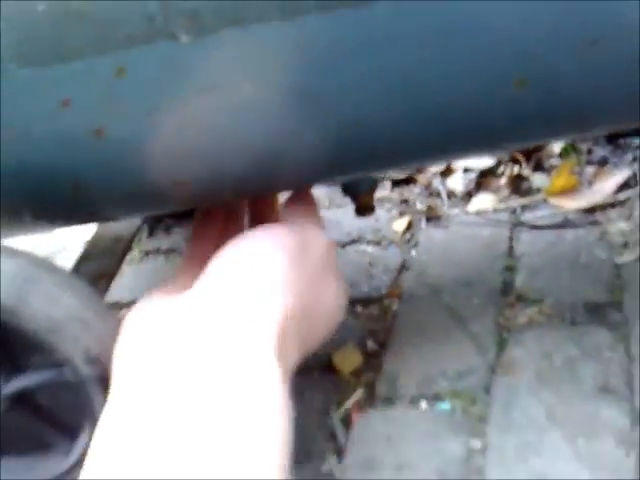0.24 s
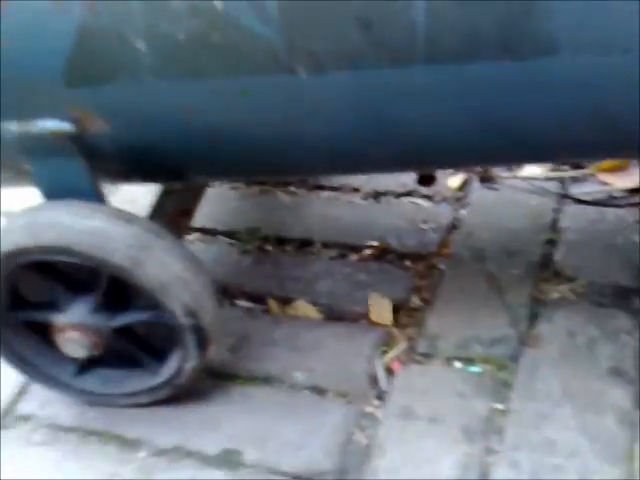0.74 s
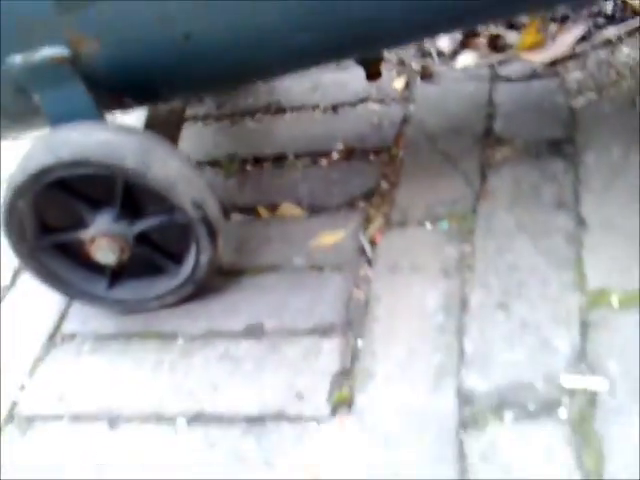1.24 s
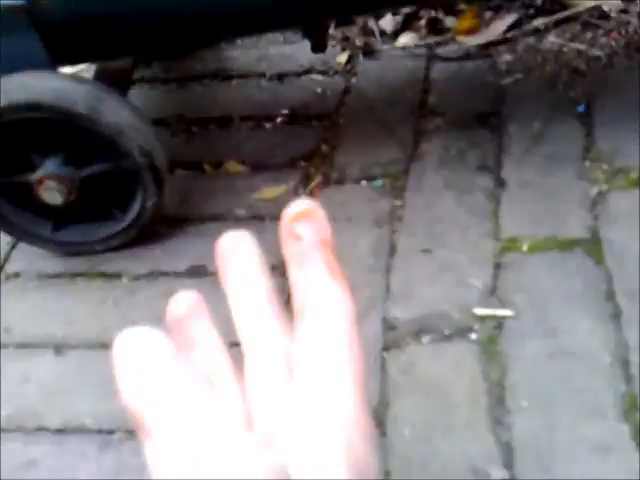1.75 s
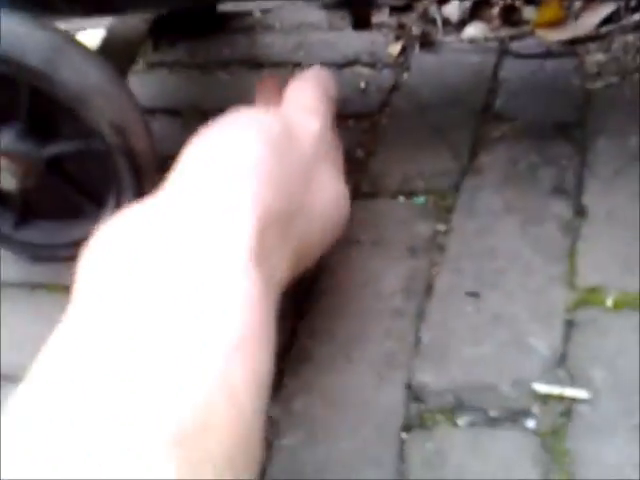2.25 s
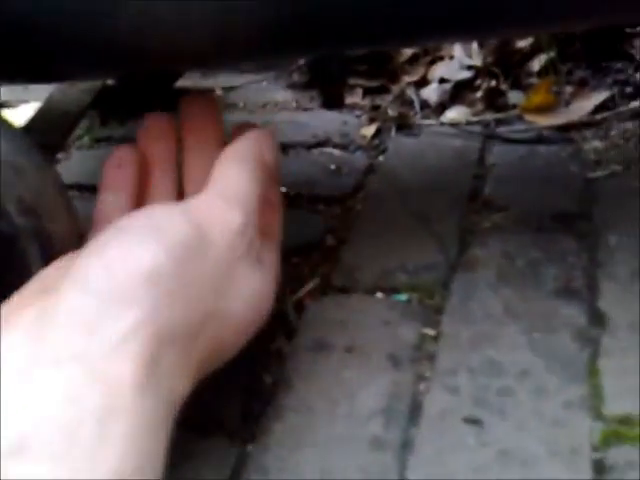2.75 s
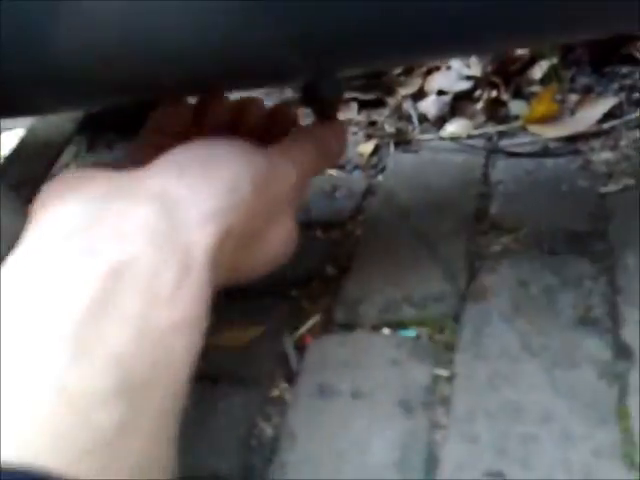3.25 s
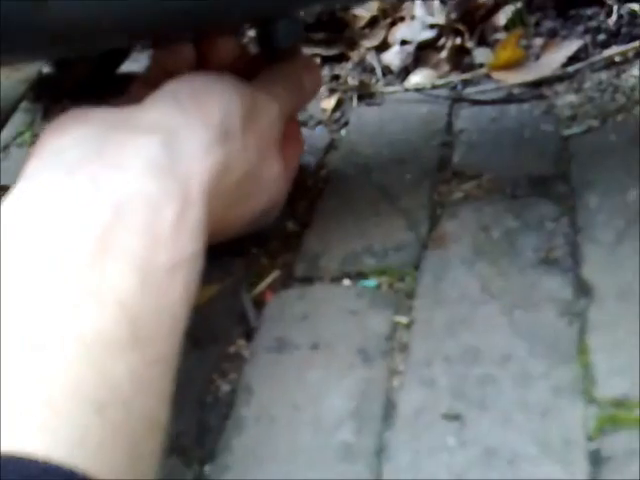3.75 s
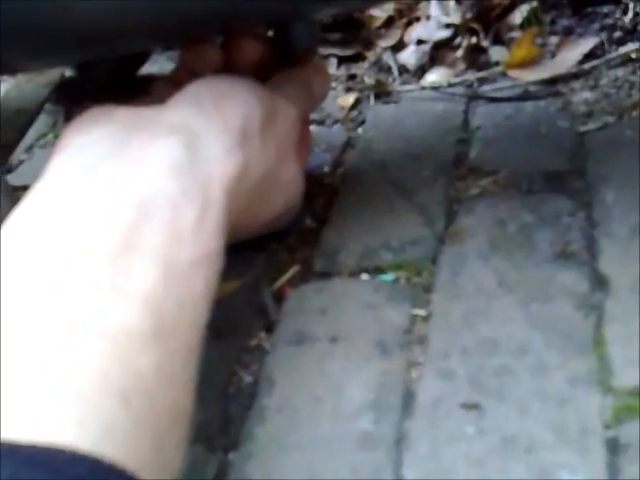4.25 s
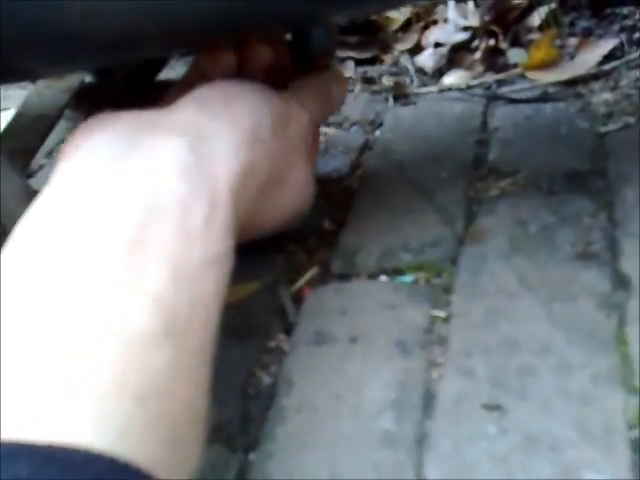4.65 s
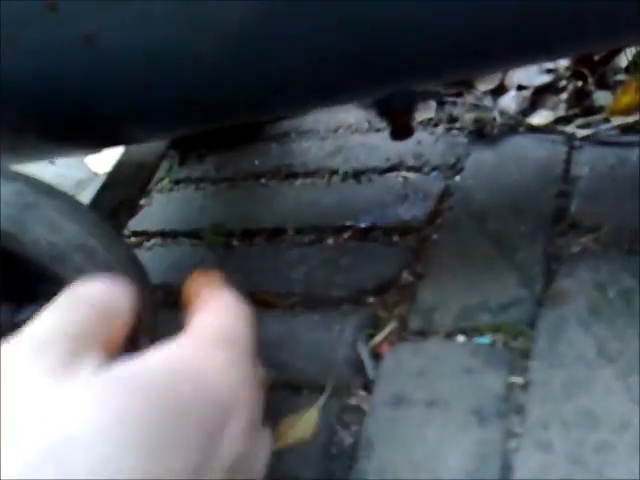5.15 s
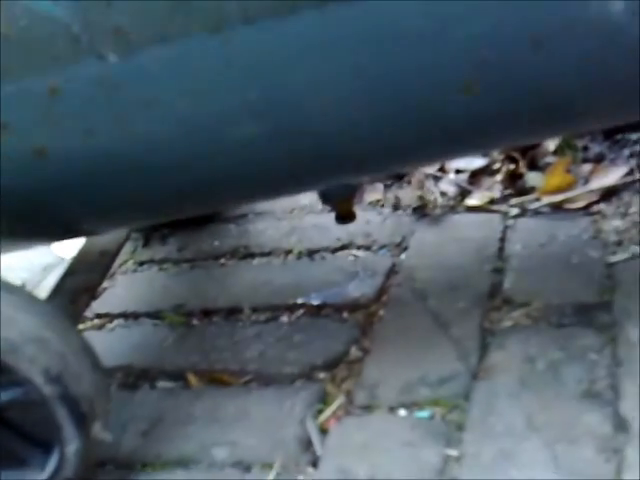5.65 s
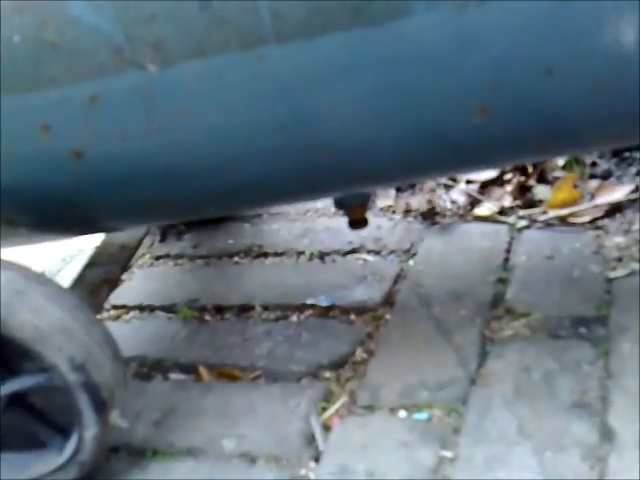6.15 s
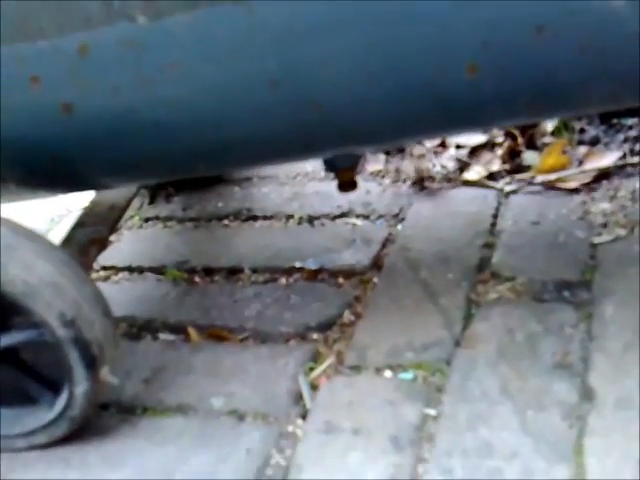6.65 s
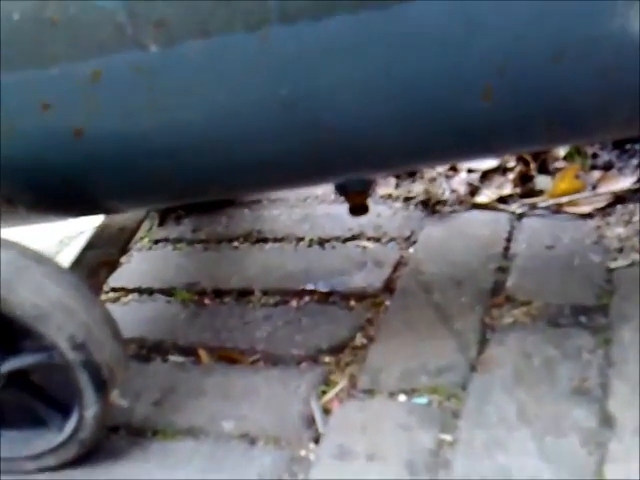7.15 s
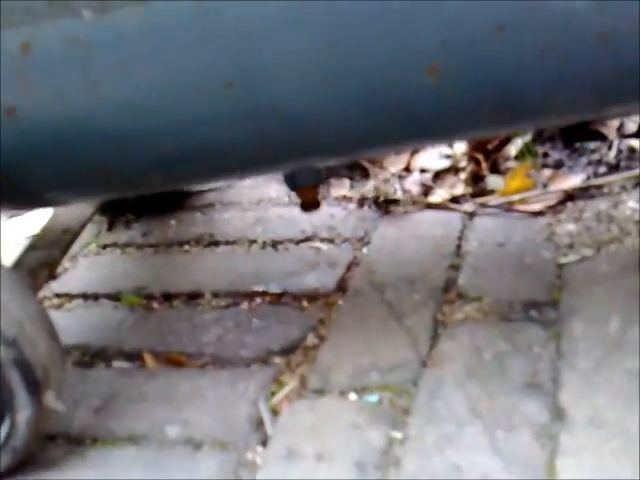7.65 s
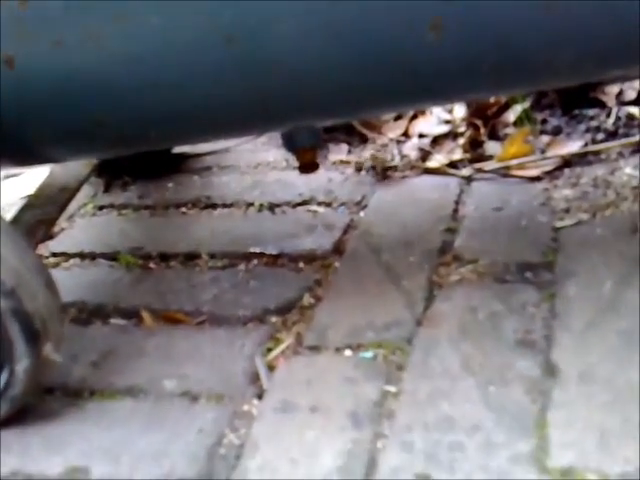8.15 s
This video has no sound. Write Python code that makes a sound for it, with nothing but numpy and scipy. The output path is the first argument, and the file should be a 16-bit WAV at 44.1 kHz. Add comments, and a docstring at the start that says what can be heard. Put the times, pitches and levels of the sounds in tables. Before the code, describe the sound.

Outdoors on paving beneath a steel tank, pressurised air escapes from a small valve in a sharp, sizzling hiss. It starts strong, drops quickly, then wavers as a hand passes and cups the flow. After about four seconds the valve opens wider and the hiss surges, overloading the close microphone, then stays loud and steadier, easing slightly at the end. Low bumps and a faint hum lie underneath.

```python
"""Compressed air hisses from the drain valve under a steel tank, over a faint wavering hum and a low rumble.
From the start a hand and the microphone move, so echoes off tank, paving and hand recolour the shaped noise;
the cupped hand rings at 0.6 and 1.4 s, air strikes it from 2.5 s, and short low sine pushes bump from 3.2 s.
From 4.1 s the valve opens wider and loud peaks clip; the hand rings again at 5.2 s and the echoes calm at 5.5 s.
Puffs of dull noise buffet the microphone at 0.6, 4.4 and 4.7 s."""
import sys
import numpy as np
from scipy import signal
from scipy.fft import rfft, irfft
from scipy.io import wavfile
from scipy.ndimage import uniform_filter1d

SR = 44100
rng = np.random.default_rng(int(sys.argv[2]) if len(sys.argv) > 2 else 0)


def dump(signal):
    """Clip the signal to [-1, 1] and save it as 16-bit WAV at the path in sys.argv[1]."""
    limited = np.clip(np.atleast_2d(signal).T, -1, 1)
    pcm = np.round(limited * 32767).astype(np.int16)
    wavfile.write(sys.argv[1], SR, pcm)


N = 369999

# Wavering tone. Each row: time in seconds, rms level of the fundamental in dB.
HUM_LEVEL = [(0.0, -51), (0.42, -59), (0.7, -47), (0.89, -56), (1.1, -44), (1.29, -52.5), (2.41, -52),
             (2.68, -66), (2.94, -49), (3.5, -60), (3.64, -45.5), (3.95, -46), (4.32, -65), (5.37, -62),
             (5.7, -53), (6.12, -55), (6.82, -54), (7.43, -63), (7.7, -45), (8.11, -65), (8.25, -48),
             (8.39, -55)]
HUM_HZ, OVERTONE_DB = 93, -15.5

# Rumble spectrum. Each row: frequency in Hz, relative density in dB per Hz.
RUMBLE_SPECTRUM = [(12, -37), (20, -15), (48, 3), (97, -10), (125, -6), (192, -9.5), (216, -14), (313, -18),
                   (700, -41), (910, -53), (1540, -120)]
# Rumble loudness before the lumps. Each row: time in seconds, level in dB rms.
RUMBLE_LEVEL = [(0, -48), (1.1, -48), (2.05, -45.5), (3.0, -47), (4.0, -46), (4.3, -52.5), (5.5, -54),
                (6.2, -48), (7.5, -50), (8.39, -56)]
LUMP_RMS_DB, LUMP_S = 1.2, .12

# Soft bumps on the microphone. Each row: start in seconds, level in dB before the arch, pitch in Hz.
BUMPS = [(3.234, -28, 68), (3.26, -25, 67.3), (3.279, -31, 61.9), (3.324, -32, 60.5), (3.396, -26.5, 99),
         (4.694, -32, 67.3)]
# Stray air on the microphone. Each row: start in seconds, level in dB before the rise, decay t60 in seconds.
PUFFS = [(.615, -43, 0.42), (4.412, -35, 0.33), (4.69, -29, .25)]

# Spectral frame step and length
HOP_SAMPLES, FRAME_SAMPLES = 128, 1024
# Jet bands: sizzle, roar, body, top. Each row: lower edge in Hz, upper edge in Hz.
BANDS_HZ = [(8000, 13500), (300, 2000), (2500, 7500), (13500, 15800)]
# Plain jet spectrum before band levelling. Each row: frequency in Hz, relative density in dB per Hz.
JET_SPECTRUM = [(150, -24.5), (1250, -22.5), (2000, -16.5), (3000, -14), (4200, -9), (7500, -6.5),
                (9500, -1.5), (12000, 1), (14000, -3), (15800, -10.5)]
# Sizzle target before local colouring. Each row: time in seconds, level in dB rms.
SIZZLE_LEVEL = [(0.0, -9.5), (0.11, -10), (0.18, -15), (0.21, -16.5), (0.54, -14), (0.93, -19), (1.03, -15),
                (1.66, -18), (1.89, -12), (2.29, -18.5), (2.36, -12), (2.5, -18.5), (2.61, -14.5),
                (2.92, -17.5), (2.94, -14.5), (3.2, -18), (3.39, -16), (3.46, -18), (3.53, -12),
                (3.62, -18.5), (3.64, -14.5), (3.86, -14.5), (4.44, -7.5), (4.46, -11.5), (5.02, -6.5),
                (5.16, -11), (7.59, -9.5), (8.39, -15.5)]
# Body and top targets before local colouring. Each row: time in seconds, body in dB rms, top in dB rms.
BODY_TOP_LEVEL = [(0.0, -23.5, -24), (0.14, -22.5, -32), (0.18, -26.5, -28), (0.44, -23.5, -25),
                  (0.91, -27, -32), (1.0, -23, -27), (1.96, -28.5, -29.5), (3.43, -22, -23.5),
                  (3.92, -25, -28), (4.02, -25.5, -29), (4.25, -19.5, -21), (4.35, -27.5, -19),
                  (4.44, -18, -14.5), (4.46, -21, -21.5), (4.77, -19, -20.5), (4.98, -18, -21.5),
                  (5.12, -22, -18), (5.16, -20.5, -21.5), (5.35, -19, -16), (5.4, -20.5, -21),
                  (5.73, -19, -18), (7.03, -14.5, -19.5), (7.69, -14, -20), (8.39, -18.5, -18.5)]
# The valve turns from a crack to wide open; the roar grows with it and follows a share of the sizzle dB.
OPEN_FROM_S, OPEN_TO_S = 4.07, 4.7
ROAR_SHUT_DB, ROAR_OPEN_DB, ROAR_FOLLOWS_SHARE = -40, -28, 0.58
# Air striking the hand under the valve adds roar.
HAND_UNDER_S, HAND_ROAR_DB = (2.47, 4.2), 2

# Echo ridges (+) and hollows (-) while hand and microphone hold a pose. Each row: start in seconds,
# end in seconds, centre in Hz, full width at half the dB in Hz, nominal lift in dB before smoothing and swelling.
RIDGES = [(0.0, 0.18, 8740, 1100, -6.5), (0.0, 0.19, 2700, 900, 3.5), (0.0, 0.2, 10250, 900, 6.0),
          (0.0, 0.54, 13910, 700, -6.0), (0.0, 0.6, 2800, 1500, 7.0), (0.0, 4.38, 4010, 1700, 6.0),
          (0.06, 5.88, 2970, 200, 2.5), (0.18, 0.66, 4090, 550, 9.0), (0.18, 3.72, 7970, 200, -3.0),
          (0.2, 0.54, 9690, 450, 6.0), (0.24, 0.9, 8910, 700, 5.5), (0.24, 8.4, 7360, 200, -3.5),
          (0.6, 6.42, 6420, 200, -2.5), (0.66, 5.04, 13740, 1700, -4.5), (0.78, 1.44, 4520, 450, -4.5),
          (0.8, 1.5, 2900, 800, -3.0), (0.8, 2.5, 1000, 350, -4.0), (0.84, 1.56, 9600, 1700, -7.0),
          (0.84, 2.58, 6160, 450, 3.5), (0.85, 1.5, 5500, 900, 2.5), (1.0, 1.36, 11280, 400, 4.0),
          (1.0, 1.4, 12200, 700, 3.5), (1.32, 8.4, 11760, 700, -2.0), (1.42, 2.76, 4610, 250, 5.0),
          (1.44, 8.4, 15460, 200, 3.5), (1.5, 2.58, 10120, 450, -6.5), (1.56, 3.36, 7620, 300, 3.5),
          (1.74, 4.14, 5640, 200, -4.0), (1.76, 2.1, 10900, 700, 3.5), (2.4, 3.9, 4780, 300, 5.0),
          (2.4, 4.3, 4440, 160, -4.0), (2.42, 4.1, 4170, 250, 3.0), (2.46, 3.78, 9690, 1700, 7.5),
          (2.52, 3.96, 11240, 450, 7.0), (2.64, 3.0, 3830, 300, -6.0), (2.76, 3.84, 3570, 300, -6.0),
          (3.66, 8.4, 8230, 700, -3.5), (3.72, 5.94, 9260, 300, -6.0), (3.84, 5.4, 8740, 700, -3.0),
          (3.9, 5.1, 5300, 1100, -5.5), (3.9, 5.28, 11070, 200, -7.5), (3.95, 4.33, 3680, 350, 4.5),
          (3.96, 4.26, 5380, 200, -9.5), (3.96, 4.98, 13480, 700, -5.5), (3.96, 5.14, 12450, 300, 5.0),
          (4.08, 8.4, 14600, 450, 4.0), (4.2, 5.12, 10250, 900, 2.5), (4.2, 5.16, 4010, 200, -5.0),
          (4.26, 5.16, 2630, 300, 5.0), (4.3, 5.14, 12400, 500, 3.5), (4.32, 5.04, 11760, 300, -6.5),
          (5.13, 6.12, 4740, 300, 3.5), (5.16, 7.98, 10720, 300, -3.5), (5.22, 8.4, 2710, 450, -3.5),
          (5.34, 7.92, 10210, 700, -6.0), (5.4, 8.0, 4400, 160, -4.0), (5.4, 8.04, 5380, 200, 4.0),
          (5.4, 8.1, 15100, 300, -2.5), (5.4, 8.4, 3450, 750, -3.0), (5.45, 8.1, 8950, 400, 2.5),
          (6.0, 8.0, 4170, 300, 2.5), (6.12, 7.8, 4700, 250, 2.5), (6.12, 8.1, 5040, 200, -6.0),
          (6.12, 8.1, 11240, 450, 4.5), (6.2, 8.3, 1750, 700, -2.5), (6.3, 7.95, 12750, 300, 2.5),
          (6.3, 7.95, 13080, 200, -3.0), (6.36, 7.92, 13310, 1100, 4.5), (6.4, 7.95, 5850, 200, 3.0),
          (6.4, 7.95, 6650, 250, 3.0), (7.8, 8.4, 4760, 300, 6.0), (7.9, 8.4, 14650, 350, 3.0)]
# Hand gone, microphone at rest: the lesser ridges shrink.
STILL_FROM_S, STILL_SHARE = 5.5, .5
# Ring of the cupped hand, one group a pass. Each row: time in seconds, centre in Hz, lift in dB before
# the swell, full width at half the dB in Hz.
CUP_PASSES = [
    [(.58, 4600, 22, 350), (.704, 4930, 0, 350), (.78, 4500, -7, 350)],
    [(1.42, 4500, 1, 250), (1.766, 4670, 0, 250), (2.25, 4530, -9, 250)],
    [(5.235, 4700, -4, 800), (5.31, 5000, 11.5, 850), (5.39, 4550, 2, 810)],
]

EDGE_HZ = 15765


def gain_of(db):
    """Decibels to amplitude."""
    return 10 ** (np.asarray(db) / 20)


def evened(x):
    """Scales to rms 1."""
    return x / np.sqrt(np.mean(x ** 2) + 1e-20)


def read(points, hz):
    """Reads a spectrum on a log-frequency axis."""
    f, value = np.transpose(points)
    return np.interp(np.log(hz + 1), np.log(f + 1), value)


def follow(rows, t):
    """Reads every column of a curve at the times t."""
    s, *columns = np.transpose(rows)
    return np.array([np.interp(t, s, c) for c in columns])


def blurred(shape, frames, bins):
    """Random field of rms 1, smoothed over time (axis 0) and frequency (axis 1)."""
    field = rng.standard_normal(shape)
    field = uniform_filter1d(field, max(round(frames), 1), axis=0)
    field = uniform_filter1d(field, max(round(bins), 1), axis=1)
    return evened(field)


def bell(hz, centre_hz, width_hz):
    """Bell of height 1, half as high at half the width off centre."""
    return .5 ** ((2 * (hz - centre_hz) / width_hz) ** 2)


def hum(waver_rms_hz=2.13):
    """A faint tone and its octave, sharing one slow random pitch drift."""
    t = np.arange(N) / SR
    drift = evened(uniform_filter1d(rng.standard_normal(N), 6000))
    phase = 2 * np.pi * np.cumsum(HUM_HZ + waver_rms_hz * drift) / SR
    tone = np.sin(phase) + gain_of(OVERTONE_DB) * np.sin(2 * phase)
    (level_db,) = follow(HUM_LEVEL, t)
    return np.sqrt(2) * gain_of(level_db) * tone


def rumble():
    """Low lumpy air movement and distant noise: shaped noise below 2 kHz."""
    hz = np.fft.rfftfreq(N, 1 / SR)
    shape = gain_of(read(RUMBLE_SPECTRUM, hz)) * (hz < 2000)
    noise = irfft(rfft(rng.standard_normal(N)) * shape, N)
    lumps = blurred((N, 1), frames=LUMP_S * SR, bins=1)[:, 0]  # one frame is one sample here
    (level_db,) = follow(RUMBLE_LEVEL, np.arange(N) / SR)
    return evened(noise) * gain_of(level_db + LUMP_RMS_DB * lumps)


def bumps(cycles=1.27):
    """Each bump is a short low push without a ring: little over one sine cycle under an arch."""
    out = np.zeros(N + SR)
    for start_s, db, hz in BUMPS:
        turns = np.arange(0, cycles, hz / SR)
        arch = np.sin(np.pi * turns / cycles)
        push = gain_of(db) * np.sin(2 * np.pi * turns) * arch
        out[round(start_s * SR):][:len(push)] += push
    return out[:N]


def puffs(top_hz=1300., rise_s=0.0055):
    """Each puff is dull noise with a quick rise and a decaying tail."""
    t, out = np.arange(SR // 2) / SR, np.zeros(N)
    dull = signal.butter(2, top_hz, fs=SR, output="sos")
    for start_s, db, t60_s in PUFFS:
        noise = evened(signal.sosfilt(dull, rng.standard_normal(len(t))))
        rise = 1 - np.exp(-t / rise_s)
        out[round(start_s * SR):][:len(t)] += noise * gain_of(db - 60 * t / t60_s) * rise
    return out


def far_echoes_db(t, hz, count=8):
    """Longer bounces off paving and tank comb the hiss finely; the paths wander as the microphone sways."""
    delay_s = np.sort(rng.uniform(.002, .011, count))
    sway_s = 5e-5 * blurred((len(t), count), frames=200, bins=1)[::4]  # every fourth frame
    strength = gain_of(-11) * (delay_s / delay_s[0]) ** -.25
    path = 1
    for a, d, s in zip(strength, delay_s, sway_s.T):
        path = path + a * np.exp(-2j * np.pi * np.outer(d + s, hz))
    mean_gain = np.sqrt(1 + np.sum(strength ** 2))
    comb_db = 20 * np.log10(abs(path) / mean_gain + .03)
    comb_db *= np.clip(hz / 9000, 0, 1) ** .4  # long waves bend round things and hardly comb
    every_frame = np.repeat(comb_db, 4, axis=0)[:len(t)]
    return uniform_filter1d(every_frame, size=4, axis=0)


def cup_db(t, hz):
    """Ring of the cupped hand: a moving ridge that swells in and out with each pass."""
    lift_db = np.zeros((len(t), len(hz)))
    for rows in CUP_PASSES:
        inside = (t > rows[0][0]) & (t < rows[-1][0])
        centre_hz, db, width_hz = follow(rows, t[inside])[:, :, None]
        swell = signal.windows.tukey(inside.sum(), .5)[:, None]
        lift_db[inside] = swell * db * bell(hz, centre_hz, width_hz)
    return lift_db


def echo_colour(t, hz, move_s=0.07, small_db=1.1):
    """Power of the hiss over time and frequency: the plain jet with bell-shaped ridges that come and go."""
    start_s, end_s, centre_hz, width_hz, db = np.transpose(RIDGES)
    span = max(round(move_s * SR / HOP_SAMPLES), 1)
    held = 1. * ((t[:, None] >= start_s) & (t[:, None] < end_s))
    for _ in range(2):
        held = uniform_filter1d(held, span, axis=0)
    ridges_db = held @ (db[:, None] * bell(hz, centre_hz[:, None], width_hz[:, None]))
    # the ridges swell and sink slowly at random throughout
    ridges_db *= 1 + .22 * blurred(ridges_db.shape, frames=80, bins=12)
    calm = np.where(t > STILL_FROM_S, STILL_SHARE, 1)[:, None]
    lesser = blurred(ridges_db.shape, frames=110, bins=11)
    ridges_db += calm * small_db * np.clip(hz / 2500, 0, 1) * lesser
    thin_bass = 1 / (1 + (93.0 / (hz + 1)) ** 2)  # a small jet radiates little bass
    return thin_bass * gain_of(2 * (read(JET_SPECTRUM, hz) + ridges_db))  # doubled dB: power


def band_targets_db(t):
    """Levels of sizzle, roar, body and top; the roar rises as the valve opens and air strikes the hand."""
    (sizzle,), (body, top) = follow(SIZZLE_LEVEL, t), follow(BODY_TOP_LEVEL, t)
    roar = np.interp(t, [OPEN_FROM_S, OPEN_TO_S], [ROAR_SHUT_DB, ROAR_OPEN_DB])
    roar += ROAR_FOLLOWS_SHARE * sizzle
    under = 1. * (t > HAND_UNDER_S[0]) * (t < HAND_UNDER_S[1])
    roar += HAND_ROAR_DB * uniform_filter1d(under, size=60)
    return np.array([sizzle, roar, body, top])


def band_correction_db(t, hz, power):
    """Lift that brings each band to its target, blended between band centres on a log axis."""
    held = np.array([10 * np.log10(power[:, (hz >= lo) & (hz < hi)].sum(1)) for lo, hi in BANDS_HZ])
    centres = np.array([np.sqrt(lo * hi) for lo, hi in BANDS_HZ])
    order = np.argsort(centres)
    log_centres = np.log(centres[order])
    share = np.array([np.interp(np.log(hz + 1), log_centres, order == k) for k in range(4)])
    return (band_targets_db(t) - held).T @ share


def to_sound(spectra):
    """Overlap-adds the short-time spectra."""
    return signal.istft(spectra.T, nperseg=FRAME_SAMPLES, noverlap=FRAME_SAMPLES - HOP_SAMPLES)[1]


def jet(patch_db=1.12, flutter_db=0.5, sputter_db=1.):
    """Turbulent noise in short-time spectra, coloured by echoes and levelled by band."""
    frames = N // HOP_SAMPLES + 5
    t, hz = np.arange(frames) * HOP_SAMPLES / SR, np.fft.rfftfreq(FRAME_SAMPLES, 1 / SR)
    shape = (frames, len(hz))
    power = echo_colour(t, hz)
    field_db = band_correction_db(t, hz, power)
    field_db += cup_db(t, hz) + far_echoes_db(t, hz)
    field_db += patch_db * blurred(shape, frames=17, bins=14)  # eddies
    field_db += flutter_db * blurred(shape, frames=20, bins=260)  # the flow flutters over wide bands
    field_db += sputter_db * blurred(shape, frames=3, bins=400)  # droplets of water spit through the valve
    noise = rng.standard_normal(shape) + 1j * rng.standard_normal(shape)
    unit = to_sound(noise).std() / np.sqrt(len(hz))  # output rms per bin of unit power
    return to_sound(noise * np.sqrt(power) * gain_of(field_db))[:N] / unit


def scene():
    """One microphone feeds both channels."""
    mono = hum() + rumble() + bumps() + puffs() + jet()
    return np.tile(mono, (2, 1))


def record(dry):
    """The peaks hit the ceiling of the recorder; then the band limit."""
    clipped = np.clip(dry, -.97, .97)
    lowpass = signal.firwin(2047, EDGE_HZ, window=("kaiser", 9), fs=SR)
    limited = signal.oaconvolve(clipped, lowpass[None], "same")
    return np.clip(limited, -1, 1)


dry = scene()
out = record(dry)
dump(out)
```